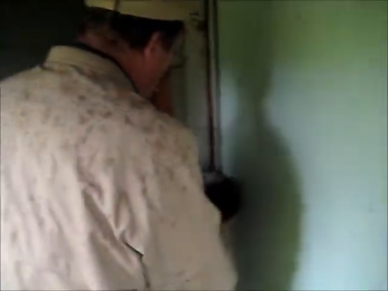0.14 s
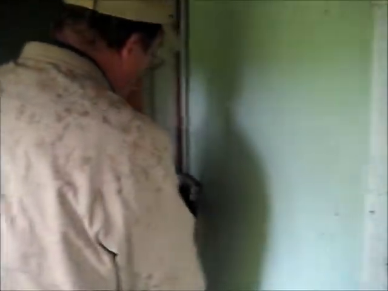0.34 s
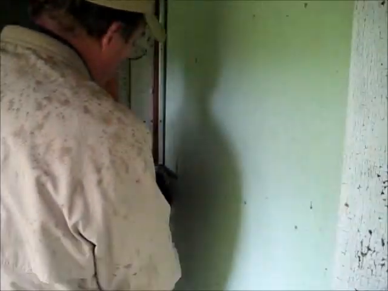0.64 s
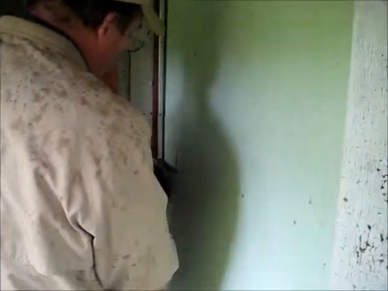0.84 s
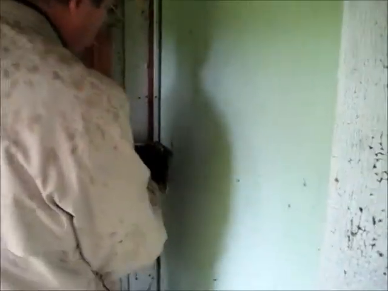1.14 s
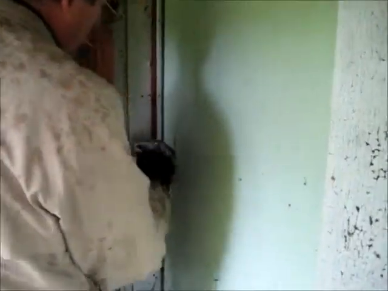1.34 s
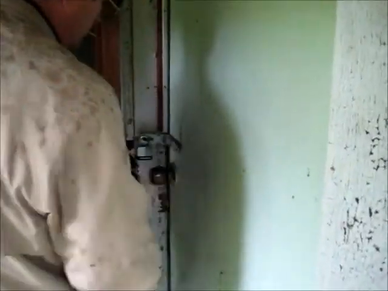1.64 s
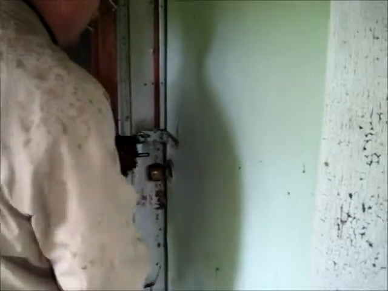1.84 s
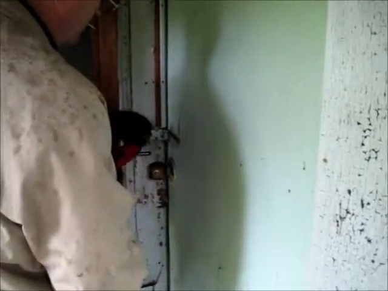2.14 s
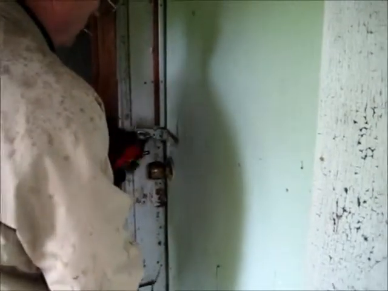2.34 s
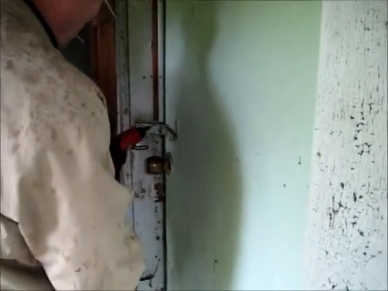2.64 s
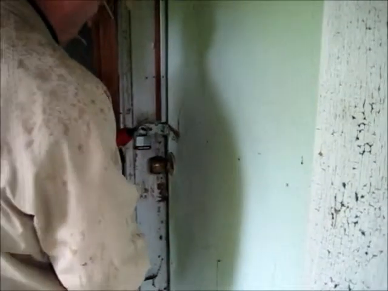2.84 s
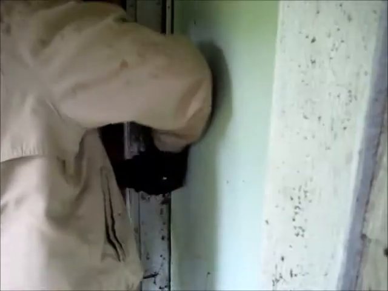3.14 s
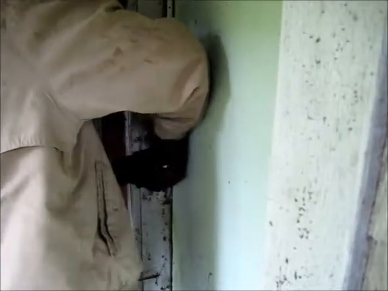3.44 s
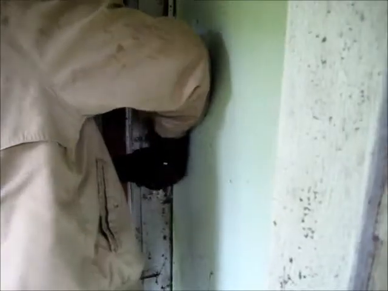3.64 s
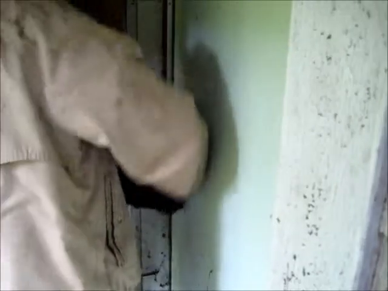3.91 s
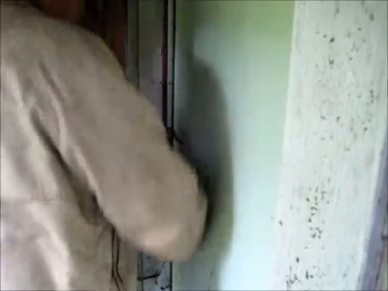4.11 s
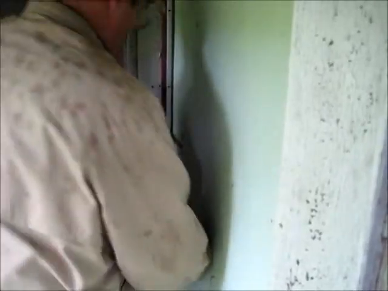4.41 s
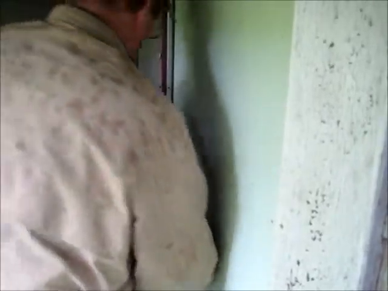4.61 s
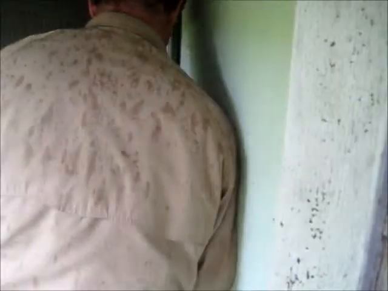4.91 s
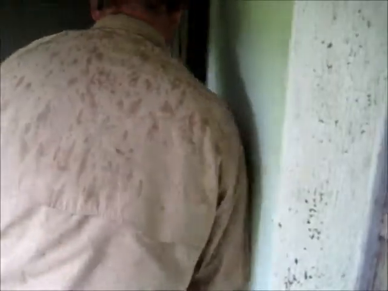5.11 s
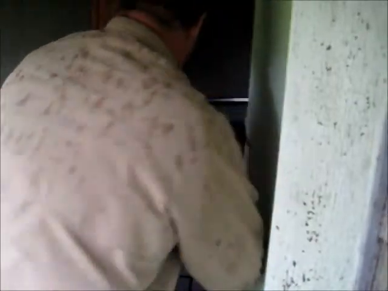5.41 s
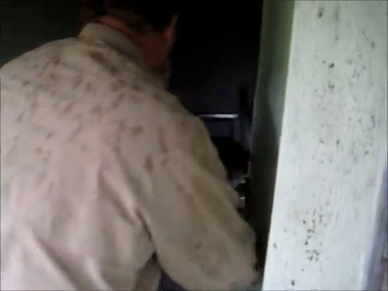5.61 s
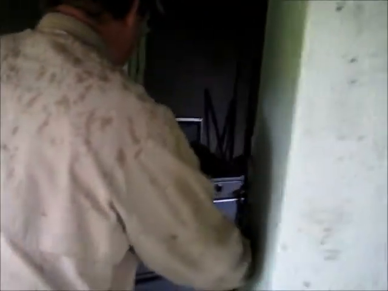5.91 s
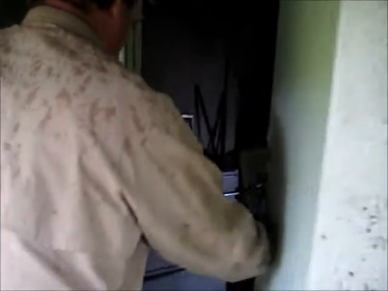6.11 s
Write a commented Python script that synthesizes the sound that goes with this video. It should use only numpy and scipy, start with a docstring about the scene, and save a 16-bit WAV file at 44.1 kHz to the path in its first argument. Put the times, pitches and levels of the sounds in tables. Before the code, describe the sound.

Steady rain patters and hisses throughout, heard from a porch, with a faint low handling rumble and barely audible hums beneath. Close by, a door's metal lock clicks lightly from 0.2 seconds. The bolt knocks at 0.6 seconds, then three times more firmly between 0.9 and 1.2. Lighter clicks and small pings follow near 1.8, 2.4 and 3.2 to 3.6 seconds, with a dull bump at 3.9. The handle gives a sharp knock at 4.6 seconds. From about 4.8 the swollen wooden door is shoved through its frame with a thump, a groaning scrape and quick cracks. The loudest snap comes at 5.1 seconds, and the rain dips for an instant. The freed door shudders, rubs and thumps softly until 5.5. A last knock, a soft thump and a few metal clicks fall between 5.6 and 5.9, leaving only rain until about 6.3 seconds.

```python
"""On a porch in steady rain, someone works the lock and handle of an old wooden door.
The rain is a superposition of countless drop impacts. Struck metal parts click and knock, exciting
the door's damped modes. Shoved, the swollen door scrapes through its frame by stick-slip friction,
snaps free and swings in with a few thumps. Faint hums, whistles and a low handling rumble lie behind
it all, and a limiter ducks the sound, rain included, for a moment after the loudest snap."""
import sys
import numpy as np
from scipy import signal
from scipy.fft import rfft, irfft, next_fast_len
from scipy.io import wavfile
from scipy.ndimage import uniform_filter1d

SR = 44100
rng = np.random.default_rng(int(sys.argv[2]) if len(sys.argv) > 2 else 0)


def materialize(psi):
    """Save the field psi as 16-bit PCM at rate SR to the path in sys.argv[1].

    A 1-D psi becomes a single channel; in a 2-D psi each row is a channel.
    """
    bounded = np.clip(np.atleast_2d(psi).T, -1, 1)
    quanta = np.round(bounded * 32767).astype(np.int16)
    wavfile.write(sys.argv[1], SR, quanta)


N = 275743
TIME = np.arange(N) / SR
BAND_LIMIT_HZ = 15900
FIRM_T60 = 0.034  # s; a longer rattle is a loose one and drowns its first contact

# Levels are relative within each table; T60 is the time for a change of 60 dB.
# Spectrum of the rain and the low rumble: f/Hz, level/dB
RAIN_SPECTRUM = [(15, -49), (25, -13), (64, -5), (99, -11.5), (130, -6.5), (157, -15), (235, -4.5),
                 (324, -6), (654, -3), (791, -0.5), (2200, -1), (4100, -1), (5670, -3), (13400, -18),
                 (15800, -24)]
# Level of the rain's patter and of a low handling rumble: t/s, patter level/dB, rumble level/dB
PATTER_AND_RUMBLE = [(0.0, -30, -50), (0.6, -31, -50.5), (1.14, -30.5, -45), (2.06, -31, -51.5),
                     (2.9, -31.5, -50.5), (3.13, -30.5, -49), (3.54, -30, -49), (3.89, -29.5, -45),
                     (4.19, -30.5, -47.5), (4.55, -29, -48.5), (4.78, -29.5, -46.5)]
# Low hums and high fizzes: start/s, end/s, f/Hz, width/Hz, level/dB
HUMS = [(.6, 1.6, 320, 45, -51), (2.95, 3.55, 133, 25, -51), (3.55, 6.3, 133, 30, -58),
        (3.7, 3.92, 12600, 1700, -45.5), (0, 6.3, 15140, 30, -63)]
# Normal modes of door and lock, from panel to small steel parts: f/Hz, level/dB, T60/s
DOOR_MODES = [(158, -5, 0.099), (200, -5, 0.064), (248, -2, 0.061), (270, -17, 0.063), (330, -3.5, 0.072),
              (343, -6, 0.094), (470, -26, 0.11), (540, 1, 0.1), (626, 6.5, 0.051), (662, -2, 0.041),
              (898, -10, 0.11), (1245, -30, 0.11), (1300, -15, 0.11), (1535, -7, 0.03), (1715, -18, 0.024),
              (2030, 3, 0.018), (2540, 6, 0.027), (3080, -27, 0.031), (3530, -1, 0.025), (4020, 12, 0.025),
              (4606, 13.5, 0.026), (5170, -1, 0.034), (6000, 7, .04), (8100, 10, .03), (8580, 11, 0.033),
              (12900, 5, .04)]
# Clicks of key, hasp and latch: t/s, level/dB, ping f/Hz, ping boost/dB, rattle T60/s
CLICKS = [(0.1995, -26, 4340, 9, 0.07), (0.329, -31, 8500, 8, 0.05), (0.3597, -27, 3700, 4, 0.05),
          (0.888, -20.5, 2480, 2, 0.056), (1.0197, -24, 2400, 2, 0.042), (1.168, -23, 2000, 2, 0.045),
          (1.1778, -21, 1900, 2, 0.045), (1.3248, -29, 6500, 0, 0.05), (1.758, -23, 2950, 13, 0.061),
          (2.3508, -21.5, 4300, 12.5, 0.025), (2.414, -25.5, 7700, 12, 0.042),
          (2.4372, -19.5, 3160, 13, 0.028), (2.4504, -25, 2500, 5, 0.045), (3.2224, -25.5, 2150, 13, 0.05),
          (3.3105, -20, 3480, 1, 0.019), (3.4038, -28, 9000, 14, 0.042), (3.576, -19.5, 3130, 16, 0.035),
          (3.5812, -23.5, 5600, 2, 0.026), (4.0508, -25.5, 6100, 18, 0.037), (4.122, -25.5, 4600, 0, 0.05),
          (4.331, -30.5, 9500, 2, 0.06), (4.5584, -18.5, 4400, -2, 0.013), (4.6593, -23, 2400, 2, 0.07),
          (4.749, -34, 13000, 5, 0.05), (5.626, -20, 2600, -1, 0.025), (5.6786, -23, 3900, 0, 0.032),
          (5.7105, -20, 2700, 2, 0.039), (5.8717, -23.5, 2840, 12, 0.07)]
# Thumps of panel and boots: t/s, level/dB, boom f/Hz, boom boost/dB, lower cutoff/Hz
THUMPS = [(0.225, -29, 155, 7, 80), (0.255, -38, 90, 8, 50), (0.615, -34, 200, 1, 45),
          (1.255, -29, 180, 12, 130), (1.49, -33.5, 201, 7, 190), (3.72, -31, 310, 7, 130),
          (3.755, -33, 249, 10, 150), (3.894, -19, 340, 5, 148), (3.912, -23.5, 230, 8, 110),
          (4.868, -20, 61, 8, 40), (4.957, -13.5, 199, 11, 40), (5.146, -21.5, 520, 4, 100),
          (5.255, -23.5, 87, 5, 40), (5.355, -20.5, 91, 13, 65), (5.374, -21.5, 270, 10, 60),
          (5.44, -25, 356, 11, 130), (5.701, -24, 79, 12, 45)]
# Thin, high whistles: start/s, end/s, start f/Hz, end f/Hz, level/dB
WHISTLES = [(.53, .68, 12000, 11600, -56), (.735, .81, 12000, 13700, -49), (.92, .99, 13800, 12000, -53),
            (4.38, 4.43, 12700, 12100, -56), (4.53, 4.555, 12700, 11900, -52),
            (4.6, 4.63, 12600, 12100, -55)]
# The bolt driven home against the door: t/s, level/dB
BOLT_THROWS = [(0.611, -31.5), (0.906, -29), (1.0751, -19.5), (1.199, -17.5)]
# Knocks of handle and bolt: t/s, level/dB, ping f/Hz, ping boost/dB, rattle T60/s, upper cutoff/Hz
KNOCKS = [(0.602, -22, 1570, 4, 0.06, 3000), (0.612, -22.5, 1400, 3, 0.04, 1860),
          (0.906, -14, 1600, 10, 0.032, 2000), (1.0758, -11, 877, 13, 0.025, 2500),
          (1.199, -11, 1390, 9, 0.037, 1900), (1.347, -24.5, 1390, 4, 0.07, 3000),
          (1.772, -21.5, 1310, 10, 0.029, 4400), (4.5822, -10.5, 1590, 11.5, 0.021, 3200),
          (5.6419, -15, 1300, 7, 0.016, 4200)]
# Effort forcing the door through its frame: t/s, level/dB
SHOVE = [(4.835, -33), (4.869, -21), (4.973, -15.5), (5.027, -27), (5.105, -29), (5.135, -25)]
# Spectrum of the groaning panel: f/Hz, level/dB
GROAN_SPECTRUM = [(15, -16), (28, -1), (65, 2.5), (120, -0.5), (200, -3.5), (350, -2.5), (520, -2.5),
                  (750, -6), (1000, 1), (1500, -12), (2500, -9.5), (5000, -60)]
# Spectrum of the rasping edge: f/Hz, level/dB
RASP_SPECTRUM = [(700, -20), (1400, -8), (2200, -3), (3500, -0.5), (5000, 2.5), (7000, -2), (10000, -8.5),
                 (15000, -18)]
# The door's edge rubs ever harder, then lets go: peak t/s, level/dB, build T60/s, release T60/s
RUBS = [(4.988, -13.5, 0.08, 0.026), (5.041, -18, 0.074, 0.13), (5.113, -21.5, 0.089, 0.068),
        (5.335, -23.5, 0.18, 0.12), (5.364, -20, 0.15, 0.12)]
# The edge slips past the frame: t/s, level/dB, ping f/Hz, ping boost/dB, rattle T60/s
SNAPS = [(4.9147, -15.5, 1040, 2, 0.023), (4.926, -16, 2400, 3, 0.02), (4.9562, -12.5, 903, 4, 0.018),
         (5.0067, -12, 920, 14, 0.015), (5.028, -14, 507, 3, 0.021), (5.0714, -9, 551, 5, 0.049),
         (5.1135, -12, 1700, 1, 0.045), (5.1396, -5, 1880, 12.5, 0.027), (5.145, -15, 629, 17.5, 0.057)]
# Vibration of the freed door: t/s, level/dB, f/Hz, T60/s
QUIVERS = [(5.169, -19, 86.6, 0.33), (5.252, -21.5, 86.5, 0.26)]


def gain_of(db):
    """Amplitude grows tenfold for every 20 dB."""
    return 10 ** (np.asarray(db) / 20)


def decay(t, t60):
    """Exponential damping: the level falls 60 dB in t60."""
    return np.exp(-np.log(1000) * t / t60)


def unit_rms(x):
    """Normalisation to unit mean power."""
    return x / np.sqrt(np.mean(x ** 2) + 1e-20)


def on_log_axis(points, hz):
    """Interpolation over logarithmic frequency."""
    f, value = np.transpose(points)
    return np.interp(np.log(hz + 1), np.log(f + 1), value)


def coloured(x, spectrum):
    """Filtering as a product of spectra, at unit rms."""
    size = next_fast_len(N)
    response = gain_of(on_log_axis(spectrum, np.fft.rfftfreq(size, 1 / SR)))
    return unit_rms(irfft(rfft(x, size) * response, size)[:N])


def add(mix, s, sound):
    """Superposition: a sound joins the mix at time s."""
    part = mix[max(round(s * SR), 0):][:len(sound)]
    part += sound[:len(part)]


def impacts(per_s, spread_db):
    """A Poisson process of tiny impacts, most small and a few large."""
    strength = gain_of(spread_db * np.minimum(rng.exponential(1, N), 4))
    return strength * rng.choice([-1, 1], N) * (rng.random(N) < per_s / SR)


def drops(per_s, spread_db, cycles):
    """Near drops ring as damped oscillators; the small, high ones are the most numerous."""
    out, t = np.zeros(N), np.arange(512) / SR
    pitches = np.geomspace(800, 13000, 20)
    for hz in pitches:
        splash = np.sin(2 * np.pi * hz * t) * np.exp(-hz * t / cycles)
        landings = impacts(per_s * hz / pitches.sum(), spread_db)
        out += np.sqrt(hz) * unit_rms(signal.oaconvolve(landings, splash)[:N])
    return unit_rms(out)


def rain(level_db=-28.5, near_db=-6, patchy_db=0.5, flicker_db=0.9, rumble_hz=450):
    """Far drops sum incoherently to noise; with near ones it swells over a low handling rumble."""
    far = rng.standard_normal(N)
    near = gain_of(near_db) * drops(per_s=2600, spread_db=3, cycles=2.3)
    hz, t, spectra = signal.stft(unit_rms(far + near), SR, nperseg=1024, noverlap=768)
    s, patter_db, rumble_db = np.transpose(PATTER_AND_RUMBLE)
    patter, rumble = (np.interp(t, s, db - np.mean(db)) for db in (patter_db, rumble_db))
    low_share = 1 / (1 + (hz[:, None] / rumble_hz) ** 2)
    swell_db = low_share * rumble + (1 - low_share) * patter
    # the level wavers both in time-frequency patches and as a whole
    patches = uniform_filter1d(rng.standard_normal(spectra.shape), size=14, axis=0)
    patches = unit_rms(uniform_filter1d(patches, size=10, axis=1))
    flicker = unit_rms(uniform_filter1d(rng.standard_normal(len(t)), size=6))
    waver_db = patchy_db * patches + flicker_db * flicker
    spectra *= gain_of(on_log_axis(RAIN_SPECTRUM, hz)[:, None] + swell_db + waver_db)
    return gain_of(level_db) * unit_rms(signal.istft(spectra, nperseg=1024, noverlap=768)[1][:N])


def hums():
    """Narrow-band noise: a randomly modulated carrier is heard as a hum when low, a fizz when high."""
    out = np.zeros(N)
    for start, end, hz, width, db in HUMS:
        pole = np.exp(-np.pi * width / SR)
        noise = rng.standard_normal(N) + 1j * rng.standard_normal(N)
        waver = signal.lfilter([1], np.poly([pole, pole]), noise)
        hum = unit_rms((waver * np.exp(2j * np.pi * hz * TIME)).real)[:round((end - start) * SR)]
        add(out, start, gain_of(db) * hum * signal.windows.tukey(len(hum), .05))
    return out


def blows(rows, modes_db, level_db, rise_s, ping_q, rattle_db, size=16384):
    """Modal excitation: an impulse and a dying rattle drive the door; hardness sets the band heard."""
    out, t = np.zeros(N), np.arange(size) / SR
    modes = sum(gain_of(db) * decay(t, t60) * np.cos(2 * np.pi * hz * t) for hz, db, t60 in DOOR_MODES)
    body = 1 + gain_of(modes_db) * rfft(modes)
    for s, db, low_hz, high_hz, t60, ping_hz, ping_db in rows:
        rattle = rng.standard_normal(size) * decay(t, t60) * -np.expm1(-t / rise_s)
        force = (t == 0) + gain_of(rattle_db) * t60 / FIRM_T60 * rattle / np.linalg.norm(rattle)
        contact = signal.butter(2, [low_hz, high_hz], "band", fs=SR, output="sos")
        sound = signal.sosfilt(contact, irfft(rfft(force) * body))
        # the struck part resonates above the rest
        ping = signal.lfilter(*signal.iirpeak(ping_hz, ping_q, fs=SR), sound)
        sound += (gain_of(ping_db) - 1) * ping
        peak_rms = np.sqrt(uniform_filter1d(sound ** 2, size=160, mode="constant").max())
        add(out, s, gain_of(db + level_db) * sound / peak_rms)
    return out


def clicks(faint_db=-29, faint_count=9):
    """Resonance of small steel parts: the smaller, the higher the ping. Faint ticks fall at random."""
    times_and_pitches = rng.uniform([0.4, 2500], [4.5, 4500], (faint_count, 2))
    faint = [(s, faint_db, hz, 5, FIRM_T60) for s, hz in times_and_pitches]
    rows = [(s, db, 0.55 * hz, min(2.2 * hz, BAND_LIMIT_HZ), t60, hz, ping_db)
            for s, db, hz, ping_db, t60 in [*CLICKS, *faint]]
    return blows(rows, modes_db=-47.5, level_db=0, rise_s=0.00092, ping_q=31, rattle_db=8.5)


def thumps(top_hz=410, t60=0.11):
    """A soft, heavy contact acts as a low-pass filter, exciting only the lowest modes."""
    rows = [(s, db, low_hz, top_hz, t60, hz, boom_db) for s, db, hz, boom_db, low_hz in THUMPS]
    return blows(rows, modes_db=-52, level_db=-2.5, rise_s=0.0041, ping_q=3.6, rattle_db=-6)


def whistles():
    """Linear chirps: thin tones glide high above the rain."""
    out = np.zeros(N)
    for start, end, from_hz, to_hz, db in WHISTLES:
        hz = np.linspace(from_hz, to_hz, round((end - start) * SR))
        phase = 2 * np.pi * np.cumsum(hz) / SR
        add(out, start, gain_of(db) * unit_rms(np.sin(phase) * np.hanning(len(hz))))
    return out


def bolt_throws(slide_lead_s=0.018, rebound_lag_s=0.012, panel_lag_s=0.024):
    """Friction, rebound, then forced vibration of the panel: each throw sinks through three bands."""
    slides = [(s - slide_lead_s, db - 3, 420, 1700, 0.078, 600, 4) for s, db in BOLT_THROWS]
    rebounds = [(s + rebound_lag_s, db - 1, 350, 1100, 0.038, 800, 6) for s, db in BOLT_THROWS]
    panels = [(s + panel_lag_s, db - 6, 120, 850, 0.15, 230, 4) for s, db in BOLT_THROWS]
    rows = slides + rebounds + panels
    return blows(rows, modes_db=-50, level_db=-1.5, rise_s=0.0028, ping_q=7, rattle_db=8)


def knocks():
    """Mass lowers resonance: the heavier handle and bolt give a low, broad ping and little treble."""
    rows = [(s, db, 0.6 * hz, top_hz, t60, hz, ping_db) for s, db, hz, ping_db, t60, top_hz in KNOCKS]
    return blows(rows, modes_db=-47.5, level_db=-1, rise_s=0.00037, ping_q=11, rattle_db=4.5)


def scrape(groan_db=-3, rasp_db=-9, fade_s=0.035):
    """Stick-slip friction under the shove: coarse slips shake the panel, fine ones rasp on the edge."""
    s, effort_db = np.transpose(SHOVE)
    fade = np.interp(TIME, [s[0] - fade_s, s[0], s[-1], s[-1] + fade_s], [0, 1, 1, 0])
    effort = gain_of(np.interp(TIME, s, effort_db)) * fade
    rubs = sum(gain_of(db) * decay(abs(TIME - at), np.where(TIME < at, build, release))
               for at, db, build, release in RUBS)
    groan = coloured(impacts(per_s=1400, spread_db=1.5), GROAN_SPECTRUM)
    rasp = coloured(impacts(per_s=14000, spread_db=3.5), RASP_SPECTRUM)
    return groan * gain_of(groan_db) * effort + rasp * np.hypot(gain_of(rasp_db) * effort, rubs)


def snaps(low_hz=390, top_hz=6100):
    """A brief force has a broad spectrum: wood jerking past wood cracks over one wide band."""
    rows = [(s, db, low_hz, top_hz, t60, hz, ping_db) for s, db, hz, ping_db, t60 in SNAPS]
    return blows(rows, modes_db=-53.5, level_db=0, rise_s=0.00033, ping_q=6.5, rattle_db=12)


def quiver(rise_s=0.0073):
    """Damped free vibration: after each release the door rings in its lowest mode."""
    out, t = np.zeros(N), np.arange(SR) / SR
    for s, db, hz, t60 in QUIVERS:
        envelope = decay(t, t60) * -np.expm1(-t / rise_s)
        add(out, s, gain_of(db) * envelope * np.sin(2 * np.pi * hz * t))
    return out


def porch(x, wet_db=-10, bass_t60=0.23, treble_t60=0.18, echoes_per_s=3000, size=16384):
    """Reverberation: close walls and roof return a short tail whose treble dies first."""
    echoes = rng.choice([-1., 1.], size) * (rng.random(size) < echoes_per_s / SR)
    echoes *= np.arange(size) > .004 * SR  # delay of the first reflection
    hz, t, spectra = signal.stft(echoes, SR, nperseg=256)
    t60 = on_log_axis([(200, bass_t60), (8000, treble_t60)], hz)[:, None]
    tail = signal.istft(spectra * decay(t, t60), SR, nperseg=256)[1]
    return x + gain_of(wet_db) * signal.fftconvolve(x, tail / np.linalg.norm(tail))[:N]


def scene():
    """Superposition at one point: door, rain and faint tones, alike in both channels."""
    door = porch(clicks() + knocks() + bolt_throws() + snaps() + thumps() + scrape()) + quiver()
    return np.tile(door + rain() + hums() + whistles(), (2, 1))


def record(dry, threshold_db=-13, recovery_db_per_s=75, squeeze=0.99, ceiling=0.97):
    """Limiting: gain drops after loud peaks and soon recovers; clipping and a low-pass filter follow."""
    power = signal.lfilter([1 / 130], [1, 1 / 130 - 1], dry[0] ** 2)  # 3 ms average
    recovery_db = TIME * recovery_db_per_s
    held_db = np.maximum.accumulate(10 * np.log10(power + 1e-12) + recovery_db) - recovery_db
    over_db = np.maximum(held_db - threshold_db, 0)
    duck_db = signal.lfilter([1 / 300], [1, 1 / 300 - 1], squeeze * over_db)  # 7 ms attack
    limited = np.clip(dry * gain_of(-duck_db), -ceiling, ceiling)
    low_pass = signal.firwin(511, BAND_LIMIT_HZ, window=("kaiser", 9), fs=SR)
    return signal.oaconvolve(limited, low_pass[None], "same")


dry = scene()
out = record(dry)
materialize(out)
```